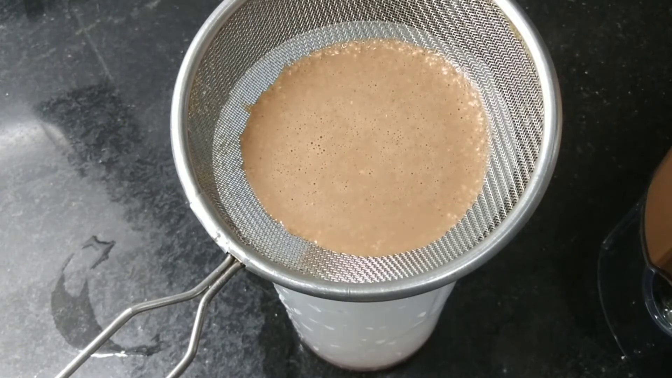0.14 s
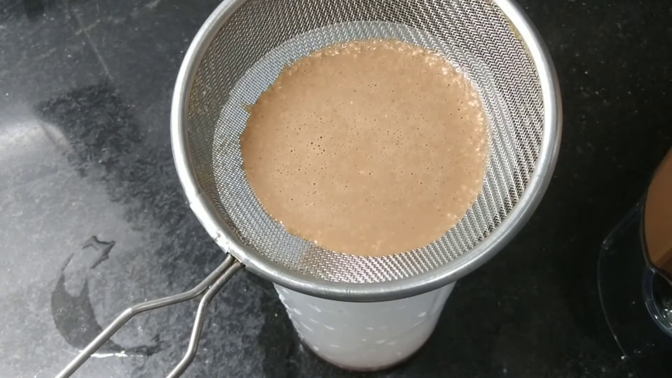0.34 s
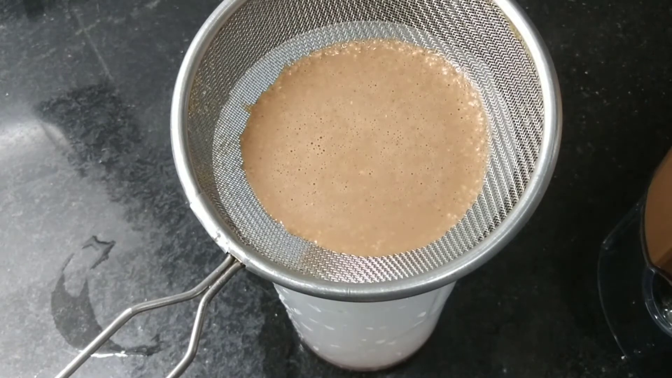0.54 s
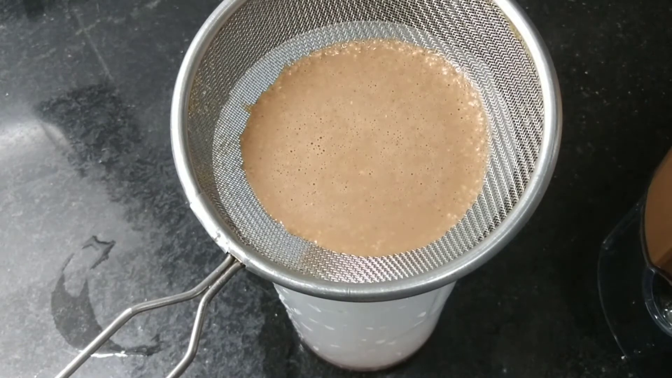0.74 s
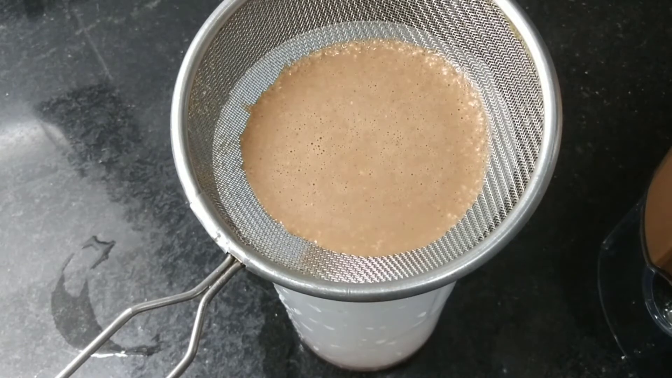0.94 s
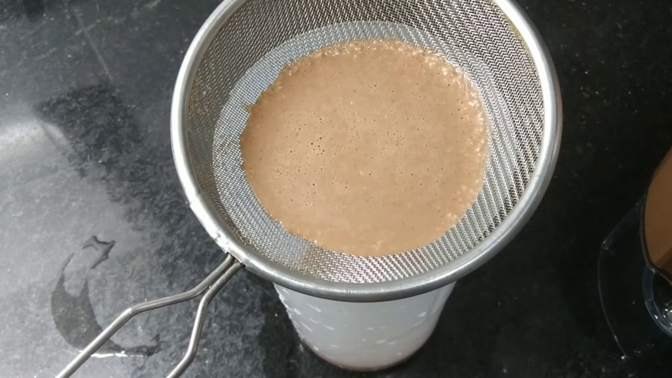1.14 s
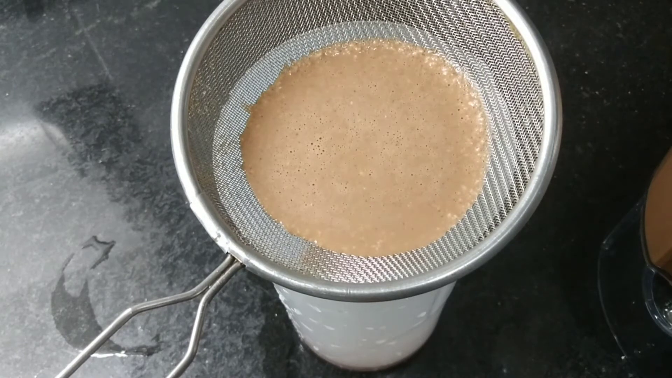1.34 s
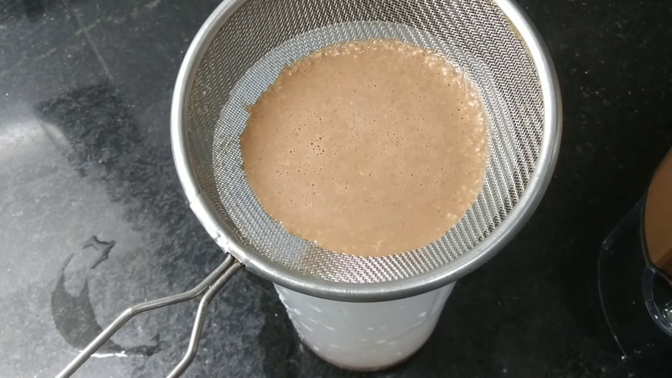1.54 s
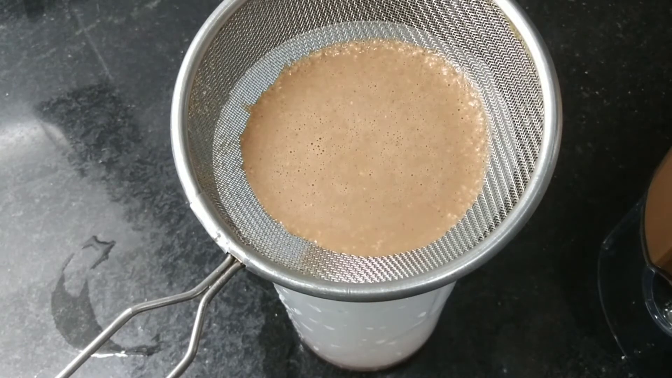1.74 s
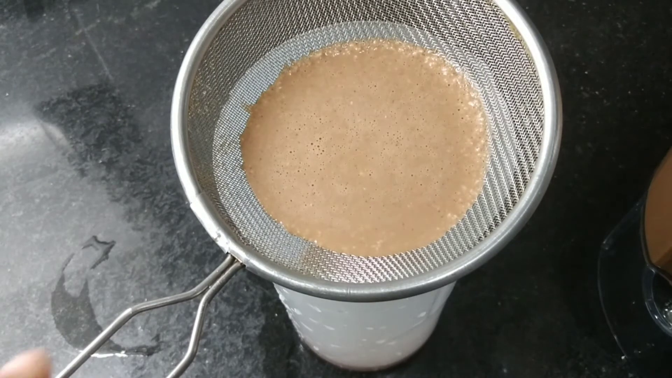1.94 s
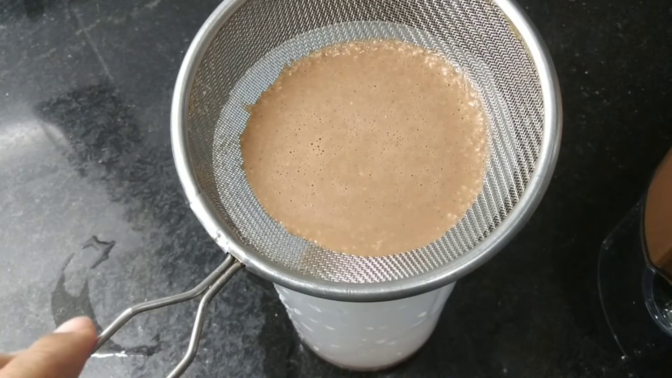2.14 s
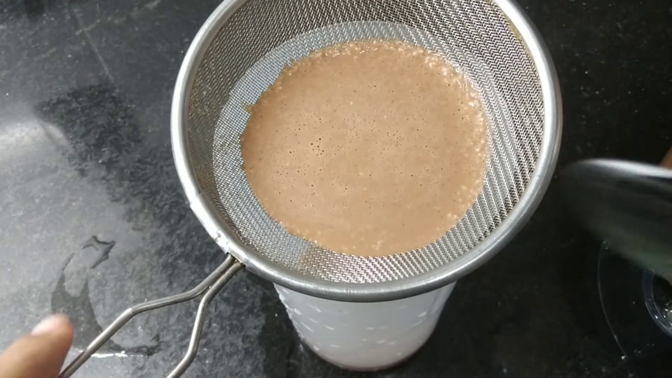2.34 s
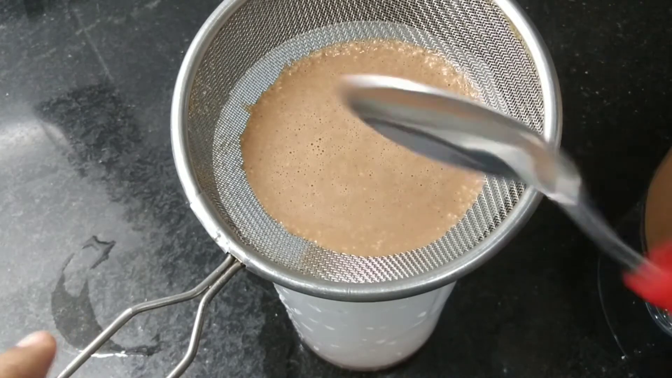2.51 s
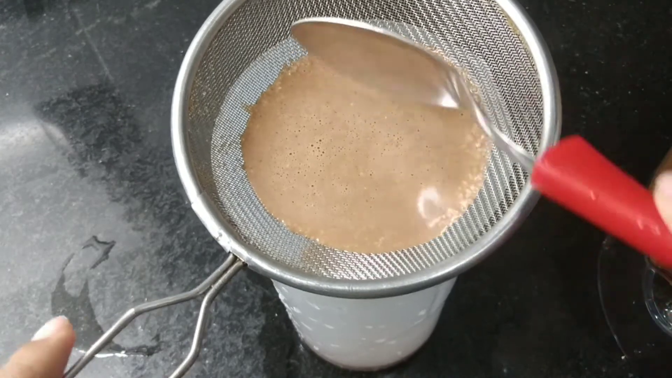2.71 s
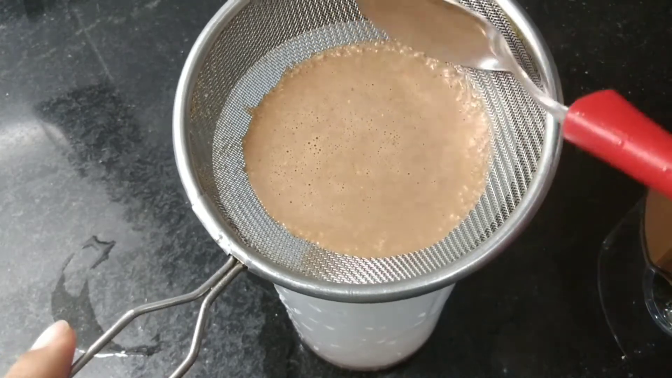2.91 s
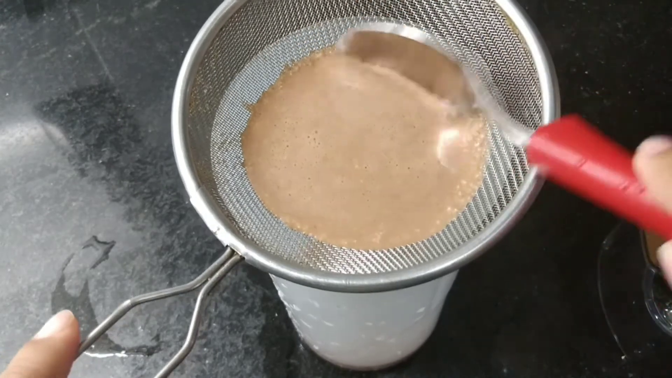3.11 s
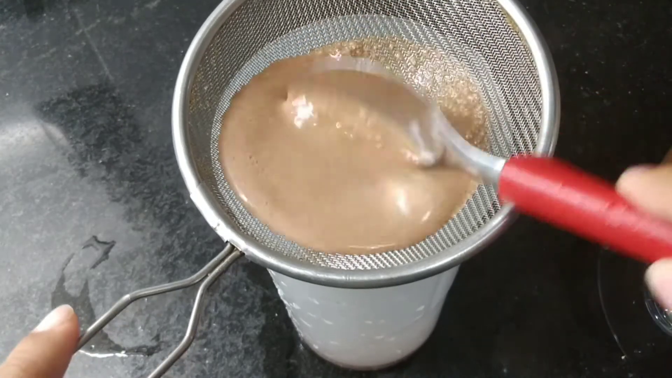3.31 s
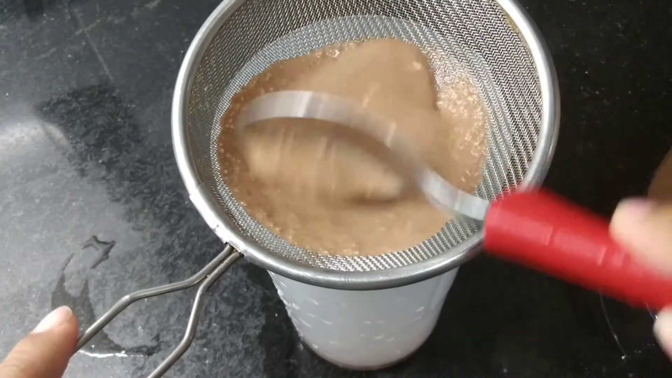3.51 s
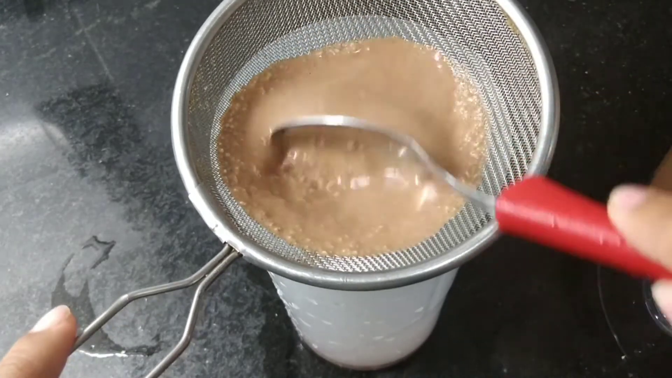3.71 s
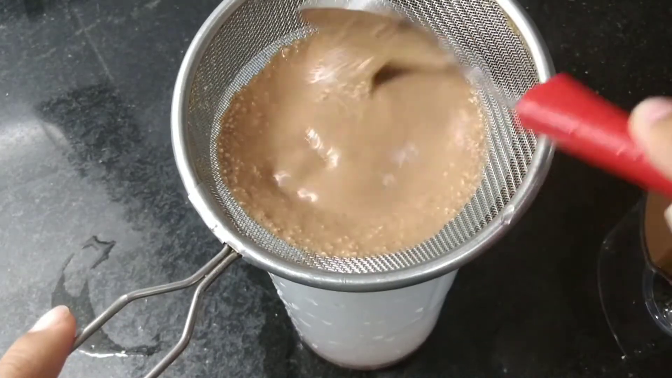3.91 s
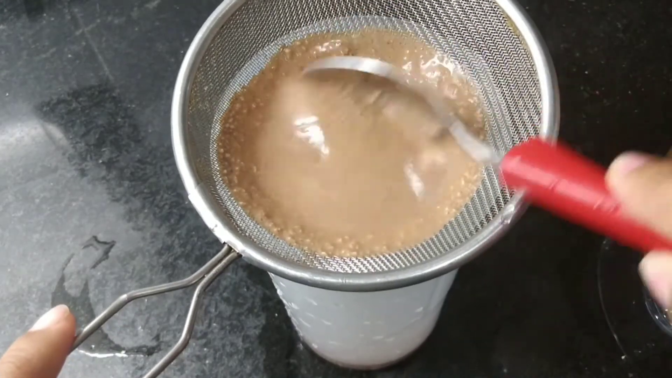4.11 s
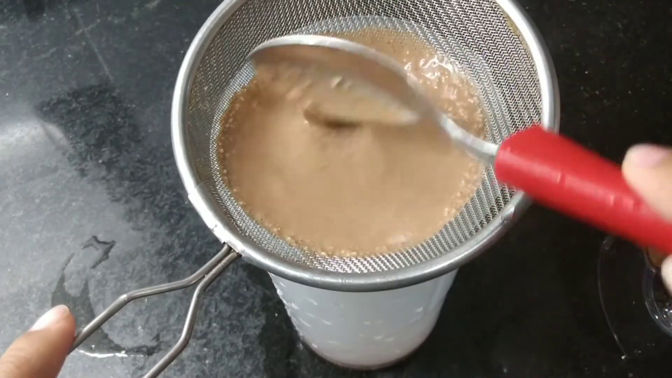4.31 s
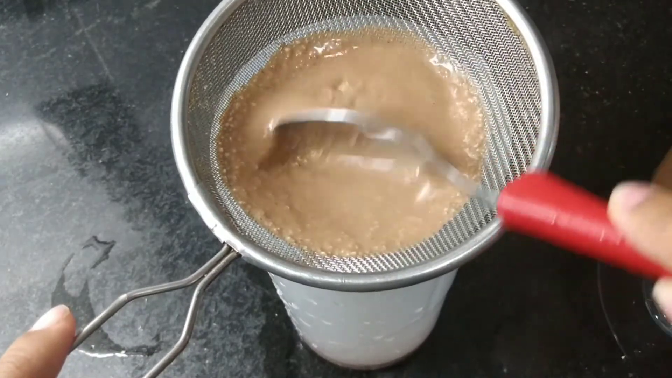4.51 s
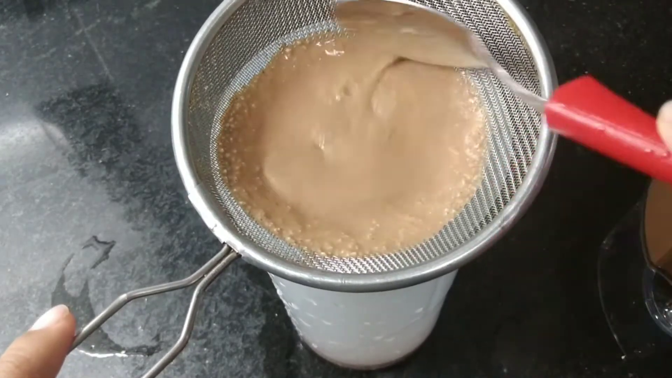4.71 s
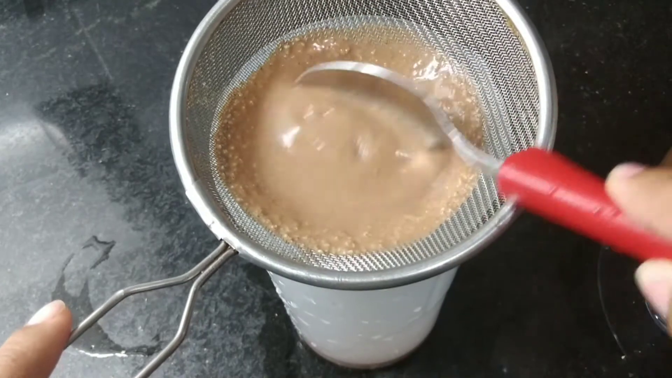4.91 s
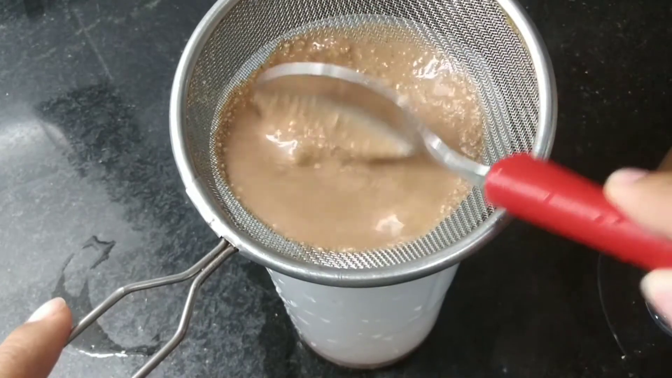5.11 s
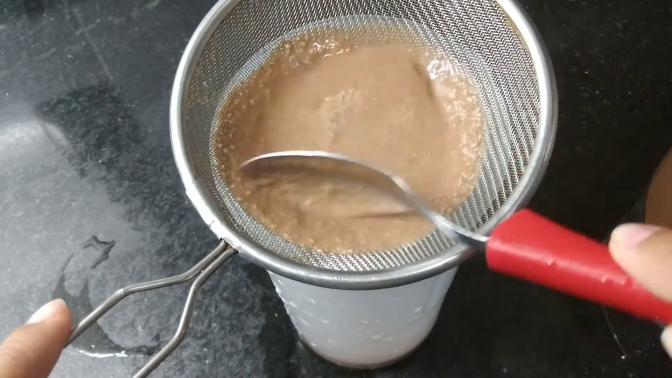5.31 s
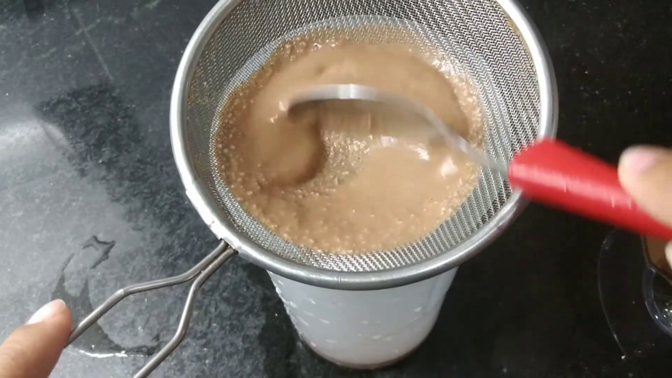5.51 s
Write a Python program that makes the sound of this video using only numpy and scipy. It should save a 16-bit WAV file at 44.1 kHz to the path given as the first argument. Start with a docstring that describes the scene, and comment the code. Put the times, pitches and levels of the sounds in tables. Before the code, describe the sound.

A cutlery drawer rumbles and bumps, spoons clink softly, then a metal spoon sweeps and knocks rhythmically over a wire sieve on a cup.

```python
"""A spoon sweeps over the wire mesh of a sieve that rocks on a tall cup: lumpy friction noise with
singing wires, a ringing frame, a cup resonance, modal knocks, liquid as a sinking resonance.
Before it a drawer of cutlery is pulled and bumps (shaped rumble, modal blows), fingers rustle and
spoons clink. Hollow drags sound further off, over a low hum of house and street (noise and two fuzzy
tones). A room rings; two spaced microphones listen through a noise suppressor."""
import sys
import numpy as np
from scipy import signal
from scipy.fft import rfft, irfft
from scipy.io import wavfile
from scipy.ndimage import uniform_filter1d

SR = 44100
rng = np.random.default_rng(int(sys.argv[2]) if len(sys.argv) > 2 else 0)


def int16_out(signal):
    """Quantize to a 16-bit WAV file."""
    q = np.round(np.clip(np.atleast_2d(signal).T, -1, 1) * 32767)
    wavfile.write(sys.argv[1], SR, q.astype(np.int16))


N = 244755


def gain_of(db):
    """Amplitude factor of a level in dB."""
    return 10 ** (np.asarray(db) / 20)


def evened(x):
    """Scales to rms 1."""
    return x / np.sqrt(np.mean(x ** 2) + 1e-20)


def read(points, hz):
    """Interpolates a (hz, value) table over log frequency."""
    f, value = np.transpose(points)
    return np.interp(np.log(hz + 1), np.log(f + 1), value)


def add(mix, start_s, sound):
    """Adds a sound at its start, cut at the end of the mix."""
    start = round(start_s * SR)
    part = mix[:, start:start + sound.shape[1]]
    part += sound[:, :part.shape[1]]


def shaped(x, points):
    """Filters both channels by a spectrum in dB, rms 1."""
    hz = np.fft.rfftfreq(x.shape[1], 1 / SR)
    return evened(irfft(rfft(x) * gain_of(read(points, hz)), x.shape[1]))


def resonate(x, hz, width_hz):
    """One resonance, rms 1."""
    return evened(signal.lfilter(*signal.iirpeak(hz, hz / width_hz, SR), x))


def grit(count, lumpy_db, lump_s=0.0015, patchy_db=3.5):
    """Friction noise: tiny catches come in lumps, and the colour drifts as other surface is touched."""
    lumps = evened(uniform_filter1d(rng.standard_normal(count), size=max(round(lump_s * SR), 1)))
    noise = rng.standard_normal((2, count)) * gain_of(lumpy_db * lumps)
    z = signal.stft(noise, nperseg=256)[2]
    patches = uniform_filter1d(rng.standard_normal(z.shape[1:]), size=5, axis=0)
    patches = uniform_filter1d(patches, size=8, axis=1)
    return signal.istft(z * gain_of(patchy_db * evened(patches)), nperseg=256)[1][:, :count]


def stroke(rise_s, hold_s, rise_db, fall_db_per_s, count):
    """Gain of one movement: a swell from first contact, a hold, a steady fade."""
    t = np.arange(count) / SR
    swell_db = -rise_db * np.maximum(1 - t / max(rise_s, 1e-3), 0)
    fade_db = -fall_db_per_s * np.maximum(t - rise_s - hold_s, 0)
    return gain_of(swell_db + fade_db) * signal.windows.tukey(count, 0.0014 * SR / count)


def blow_ring(modes, treble_db, ring_db, pitch, vary_db, spread, t):
    """Struck modes: each is a cluster of 4 close decaying partials, drawn anew for each blow."""
    hz, db, t60_s = np.repeat(np.transpose(modes), 4, axis=1)[:, :, None]
    draw = rng.standard_normal((4, len(hz), 1))
    lift_db = np.where(hz > 5400, treble_db, np.where(hz > 3400, ring_db, 0))
    size = gain_of(db + lift_db + vary_db * np.tanh(draw[0]) - 60 * t / t60_s)
    shift = np.where((hz > 2300) & (hz < 3400), 1, pitch)  # this band keeps its pitch
    detune = np.where(hz > 700, shift + spread * draw[1], 1 + 0.0065 * draw[1])
    phase = 2 * np.pi * hz * detune * t + 0.86 * draw[3]
    # phase between channels, one draw per mode
    apart = -np.repeat(1.4 + .4 * draw[2, ::4], 4, axis=0) * np.minimum(hz / 900, 1)
    return np.array([(size * np.sin(phase + k * apart)).sum(0) for k in (0, 1)])


def blow_crack(treble_db, ring_db, crack_db, crack_s, t):
    """Contact noise: a crack with t60 crack_s plus an 8 ms tick."""
    colour = [(150, -43.5), (700, -36.0), (1500, -10.5), (4200, ring_db - 7.5),
              (6000, treble_db), (9500, treble_db), (16000, treble_db - 44.0)]
    level_db = crack_db + max(treble_db, ring_db - 10.0, 0)
    crack = shaped(rng.standard_normal((2, len(t))), colour) * gain_of(level_db)
    return crack * (gain_of(-60 * t / crack_s) + gain_of(-15.0 - 60 * t / 0.008))


def blows(events, modes, crack_db, crack_s, vary_db, spread):
    """Impacts: ringing modes started by a crack, with a 1.5 ms attack."""
    out, t = np.zeros((2, N)), np.arange(SR // 6) / SR
    for start_s, blow_db, treble_db, *more in events:
        ring_db, pitch = more or (0, 1)
        ring = blow_ring(modes, treble_db, ring_db, pitch, vary_db, spread, t)
        crack = blow_crack(treble_db, ring_db, crack_db, crack_s, t)
        add(out, start_s, gain_of(blow_db - 16.0) * (ring + crack) * np.minimum(t / 0.0015, 1))
    return out


# hum noise spectrum, relative: hz, level_db_per_hz
HUM_SPECTRUM = [(20, -19), (55, -10), (80, 4), (228, -4.5), (420, -5), (650, -15.5), (1200, -38.5),
                (8000, -29), (11000, -44), (14000, -85)]
# fuzzy tones: pitch_hz, width_hz, over_noise_db
HUM_TONES = [(85.15, 1.6, -11), (300.8, 4.6, -7.5)]
# hum level: time_s, level_db
HUM_COURSE = [(0, -62.5), (1.5, -65.5), (1.6, -61), (1.7, -65), (2.9, -61.5), (4.301, -66.5),
              (4.498, -64.5), (4.7, -62), (5.2, -62), (5.35, -56.5), (5.55, -64)]


def hum():
    """House and street: low noise with two fuzzy tones."""
    x = rng.standard_normal((2, N))
    tones = sum(gain_of(db) * resonate(x, hz, width_hz) for hz, width_hz, db in HUM_TONES)
    level_db = np.interp(np.arange(N) / SR, *np.transpose(HUM_COURSE))
    return gain_of(level_db) * (shaped(x, HUM_SPECTRUM) + tones)


# hollow dragging: start_s, rise_s, hold_s, level_db
DRAG_MOVES = [(1.956, 0.044, 0.29, -76), (2.46, 0.029, 0.32, -61), (3.238, 0.11, 0.086, -50)]
# resonances, one list per drag: pitch_hz, width_hz, level_db (relative)
DRAG_RESONANCES = [
    [(574, 80, -1), (792, 37, 7)],
    [(2370, 560, -10), (561, 50, 4.5), (919, 20, -2.5), (1061, 15, -4), (1760, 23, -10), (1210, 480, -6.5),
     (4630, 230, -8.5)],
    [(686, 21, 0.99), (765, 17.5, 6.8), (1300, 28, 4.2)],
]
DRAG_RISE_DB, DRAG_FALL_DB_PER_S = 23, 66


def drags():
    """Dragging further off: friction noise in the resonances of a hollow thing."""
    out = np.zeros((2, N))
    for (start_s, rise_s, hold_s, level_db), peaks in zip(DRAG_MOVES, DRAG_RESONANCES):
        x = grit(SR, 1.5, 0.03, 2.)
        body = evened(sum(gain_of(db) * resonate(x, hz, width_hz) for hz, width_hz, db in peaks))
        pull = stroke(rise_s, hold_s, DRAG_RISE_DB, DRAG_FALL_DB_PER_S, count=SR)
        add(out, start_s, gain_of(level_db) * pull * body)
    return out


# drawer pushes: start_s, rise_s, hold_s, rumble_db, treble_over_rumble_db
DRAWER_PUSHES = [(0.084, 0.0021, 0.023, -63, 4), (0.129, 0.026, 0.092, -44.5, -4.5),
                 (0.369, 0.0027, 0.014, -37, -3), (0.584, 0.02, 0.0059, -52, 0.5)]
# rumble spectrum, relative: hz, level_db_per_hz
DRAWER_SPECTRUM = [(56, -59.5), (95, 1.5), (170, -14), (300, -6.5), (520, -5.5), (884, -3.5), (1190, -9.5),
                   (8410, -17.5), (16000, -32.5)]
# wood and its load of steel: pitch_hz, level_db, t60_s
DRAWER_RING = [(113.7, -16.5, 0.72), (569, -15, 0.21), (625, -7, 0.15), (975, -29.5, 0.22),
               (1212, -6.5, 0.15), (1642, -6, 0.1), (2166, 4.5, 0.021), (4590, 0.5, 0.018),
               (6500, 1, 0.051), (7820, 0.5, 0.094), (8400, 5.5, 0.091)]
# bumps: start_s, blow_db, treble_over_blow_db, clatter_4khz_over_blow_db, pitch_factor
DRAWER_HITS = [(0.093, -61.5, 9.5, -1.5, 1.4), (0.13, -46.5, 5.5, -4.5, 1.16),
               (0.158, -35.5, -7.5, -1, 1.03), (0.242, -49, 7.5, -3.5, 1.06), (0.284, -36.5, -17, -9, 0.99),
               (0.376, -24, -6.5, 4, 1), (0.425, -26.5, -14.5, -3, 0.93), (0.524, -51, 10.5, 15, 1.1),
               (0.611, -45.5, 1, 7, 1.26), (0.629, -49, 3.5, 13, 1)]
DRAWER_RISE_DB, DRAWER_FALL_DB_PER_S = 8, 147


def drawer():
    """Runners rumble as friction noise, split at 4.8 kHz, while the load rattles in modal blows."""
    out = blows(DRAWER_HITS, DRAWER_RING, crack_db=12.6, crack_s=0.058, vary_db=3.8, spread=0.02)
    treble_pass = signal.butter(4, 4800, "high", fs=SR, output="sos")
    for start_s, rise_s, hold_s, rumble_db, treble_db in DRAWER_PUSHES:
        x = shaped(grit(SR // 2, 1.0, 0.00077), DRAWER_SPECTRUM)
        high = signal.sosfilt(treble_pass, x)
        rumble = evened(x - high) + gain_of(treble_db) * evened(high)
        push = stroke(rise_s, hold_s, DRAWER_RISE_DB, DRAWER_FALL_DB_PER_S, count=SR // 2)
        add(out, start_s, gain_of(rumble_db) * push * rumble)
    return signal.sosfilt(signal.butter(4, 85, "high", fs=SR, output="sos"), out)


# finger brushes: middle_s, level_db, half_length_s, middle_tones_over_hiss_db
RUSTLE_MOVES = [(1.183, -60, 0.038, -8), (1.336, -58, 0.064, -16), (1.572, -62.5, 0.045, -4.5),
                (1.619, -67.5, 0.038, 6), (1.705, -78, 0.015, 16), (1.81, -68.5, 0.027, -0.5),
                (1.908, -72.5, 0.027, 12), (1.976, -54, 0.022, -16), (2.027, -61, 0.042, -6.5),
                (2.102, -72, 0.03, -1), (2.242, -58, 0.047, -17), (2.329, -66, 0.031, 4.5)]
# hiss spectrum, relative: hz, level_db_per_hz
RUSTLE_HISS_SPECTRUM = [(2650, -47), (4500, -75), (5220, -12.5), (8460, 0), (12300, -14), (15100, -23),
                        (16000, -16)]
# middle tones spectrum, relative: hz, level_db_per_hz
RUSTLE_MIDDLE_SPECTRUM = [(1300, -68), (2000, 3), (2800, 10), (3300, 2.5), (5000, 6.5), (6500, -28)]


def rustles():
    """Fingers brush along the cutlery: friction noise in soft Gaussian swells."""
    out = np.zeros((2, N))
    for middle_s, level_db, half_s, middle_db in RUSTLE_MOVES:
        t = np.arange(-3 * half_s, 3 * half_s, 1 / SR)
        x = grit(len(t), 1.5, .004, 2.5)
        hiss = shaped(x, RUSTLE_HISS_SPECTRUM) + gain_of(middle_db) * shaped(x, RUSTLE_MIDDLE_SPECTRUM)
        add(out, middle_s + t[0], gain_of(level_db) * np.exp(-(t / half_s) ** 2) * hiss)
    return out


# cutlery: pitch_hz, level_db, t60_s
CUTLERY_RING = [(431.3, -5.5, 0.13), (1425, -17.5, 0.094), (1500, -7, 0.13), (2603, 3, 0.049),
                (2760, -1, 0.11), (3690, -2.5, 0.066), (7430, -0.5, 0.031)]


def chatter(level_db, until_s, ticks_per_s):
    """Loose cutlery ticks faintly in its tray: random impulses, about half of them into each mode."""
    count = round(until_s * SR)
    sizes = gain_of(1.4 * np.minimum(rng.exponential(1, count), 3))
    ticks = (rng.random(count) < ticks_per_s / SR) * sizes * rng.standard_normal((2, count))
    ring = np.zeros((2, count))
    for hz, db, t60_s in CUTLERY_RING[:-1]:
        ring += gain_of(db) * resonate(ticks * (rng.random(count) < .5), hz, 7 / t60_s)
    out = np.zeros((2, N))
    add(out, 0, gain_of(level_db) * evened(ring))
    return out


# spoon clinks: start_s, blow_db, treble_over_blow_db
CLINK_HITS = [(0.792, -63, 9), (0.9428, -49, -3), (1.064, -57.5, -22), (1.108, -53, -14),
              (1.1411, -47, -12), (1.1747, -48.5, -55), (1.216, -67.5, 24.5), (1.421, -51, -6),
              (1.5734, -70, -9), (1.6175, -59.5, 21.5), (1.6939, -60, 21.5), (1.746, -46, -5),
              (1.7934, -50, 8), (1.907, -52.5, -11), (1.9585, -52.5, 10), (2.0988, -52, 18),
              (2.169, -51, 11.5), (2.3027, -51.5, 10), (2.34, -48, -9), (2.4722, -59, -38),
              (2.536, -49, -28), (2.6354, -49.5, -15), (2.7353, -49, 6.5), (2.788, -49, -7),
              (2.8825, -51.5, 21), (2.9212, -52.5, 13.5), (2.9716, -46.5, 13), (3.4934, -48, 16),
              (3.5047, -40, 15.5)]


def clinking():
    """Spoons clink as modal blows over the faint chatter of the tray."""
    clinks = blows(CLINK_HITS, CUTLERY_RING, crack_db=5.3, crack_s=0.05, vary_db=4.0, spread=.025)
    return clinks + chatter(level_db=-74, until_s=3.07, ticks_per_s=250)


# liquid strokes: start_s, rise_s, hold_s, level_db, pitch_hz
SLOSH_MOVES = [(4.039, 0.015, 0.02, -58.5, 1406), (4.459, 0.089, 0.11, -69, 820),
               (4.775, 0.031, 0.013, -55, 1350), (4.917, 0.093, 0.037, -61, 1330),
               (5.245, 0.16, 0.042, -61.5, 2100)]
SLOSH_RISE_DB, SLOSH_FALL_DB_PER_S = 7, 112
SLOSH_SAG_PER_S, SLOSH_WIDTH_HZ = 0.72, 280


def slosh():
    """Thick liquid slides round the spoon: lumpy noise in a resonance that sinks as the liquid closes."""
    out, t = np.zeros((2, N)), np.arange(SR // 2) / SR
    r = np.exp(-np.pi * SLOSH_WIDTH_HZ / SR)
    for start_s, rise_s, hold_s, level_db, pitch_hz in SLOSH_MOVES:
        sinking_hz = pitch_hz * (1 - SLOSH_SAG_PER_S * t)
        turn = np.exp(2j * np.pi * np.cumsum(sinking_hz) / SR)
        # shift down to 0 Hz, low-pass, shift back
        low = signal.lfilter([1], [1, -2 * r, r * r], grit(len(t), 1.5, 0.008, 2.5) / turn)
        x = evened((turn * low).real)
        move = stroke(rise_s, hold_s, SLOSH_RISE_DB, SLOSH_FALL_DB_PER_S, count=len(t))
        add(out, start_s, gain_of(level_db) * move * x)
    return out


# sieve: pitch_hz, level_db, t60_s
SIEVE_RING = [(370.2, -5, 0.14), (1398, -14, 0.16), (1560, -5, 0.029), (2036, 5, 0.045), (2462, 0.5, 0.052),
              (2775, -4.5, 0.029), (4260, -5, 0.014), (8030, -3.5, 0.028)]
FRAME_DB, CATCHES_PER_S = -15, 350


def frame(x):
    """Single wires snag at random and ring the sieve's frame, rms 1."""
    count = x.shape[1]
    caught = rng.random(count) < CATCHES_PER_S / SR
    snags = x * caught * gain_of(4.0 * np.minimum(rng.exponential(1, count), 3))
    ring = np.zeros_like(x)
    for hz, db, t60_s in SIEVE_RING[1:]:
        ring += gain_of(.5 * db) * resonate(snags, hz * rng.uniform(.95, 1.02), 4 / t60_s)
    return evened(ring)


# walls of cup and counter, relative: hz, level_db_per_hz
CUP_WALLS = [(120, -19), (220, 8.5), (600, -3.5), (1100, -18), (2000, -40)]
CUP_HZ, CUP_WIDTH_HZ, CUP_SECOND_WIDTH_HZ = 362, 26, 64.6


def cup(x):
    """Noise through two resonances is the cup's air column; the friction also stirs its walls."""
    air = resonate(rng.standard_normal(x.shape[1]), CUP_HZ, CUP_WIDTH_HZ)
    return resonate(air, CUP_HZ, CUP_SECOND_WIDTH_HZ) + gain_of(-7.0) * shaped(x, CUP_WALLS)


RUB_RISE_DB, RUB_FALL_DB_PER_S = 8, 234
SING_DB, SING_WIDTH = -5, 0.1  # over the hiss; width as share of pitch
CUP_RISE_DB, CUP_LINGER_S, CUP_FALL_DB_PER_S = 11, 0.043, 222  # the cup hums on after the stroke


def rubbing(strokes, hiss, lumpy_db, patchy_db):
    """Catches on fine metal hiss and sing; strokes with a cup level also ring frame and cup."""
    out, count = np.zeros((2, N)), SR // 2
    for start_s, rise_s, hold_s, hiss_db, top_db, sing_hz, *cup_db in strokes:
        x = grit(count, lumpy_db, 0.00099, patchy_db)
        singing = gain_of(SING_DB) * resonate(x, sing_hz, SING_WIDTH * sing_hz)
        wires = shaped(shaped(x, hiss) + singing, [(8500, 0.003), (12500, top_db)])
        move = stroke(rise_s, hold_s, RUB_RISE_DB, RUB_FALL_DB_PER_S, count)
        sound = gain_of(hiss_db) * wires * move
        for level_db in cup_db:
            sound += gain_of(hiss_db + FRAME_DB) * frame(x) * move
            breath = stroke(rise_s, hold_s + CUP_LINGER_S, CUP_RISE_DB, CUP_FALL_DB_PER_S, count)
            sound += gain_of(level_db) * cup(x) * breath
        add(out, start_s, sound)
    return out


# strokes on the rim: start_s, rise_s, hold_s, hiss_db, top_octave_over_hiss_db, sing_hz
RIM_STROKES = [(2.884, 0.0017, 0.0041, -54.5, 4, 7550), (2.973, 0.044, 0.018, -51.5, 7.5, 7900)]
# rim hiss spectrum, relative: hz, level_db_per_hz
RIM_HISS = [(940, -56), (1600, 1), (5990, 5.5), (7260, -2), (13500, -2.5), (16000, -10)]


def rim_strokes():
    """The spoon feels its way along the rim: friction hiss without the cup."""
    return rubbing(RIM_STROKES, RIM_HISS, lumpy_db=1.8, patchy_db=2.3)


# sieve knocks: start_s, blow_db, treble_over_blow_db, spoon_ring_4khz_over_blow_db,
# pitch_factor (load on the mesh shifts; the rim near 2.5 kHz keeps its pitch)
SIEVE_HITS = [(3.097, -53, 5, -3, 1), (3.8646, -31, -28, -15.5, 0.98), (4.009, -53, 13.5, -10, 0.71),
              (4.3937, -47, 4, -4, 1.0), (4.4383, -39.5, 13, 17.5, 0.98), (4.557, -38.5, -3, 15.5, 1),
              (4.6042, -36, 3, 11.5, 0.94), (4.6683, -37.5, -19, -3, 0.91), (4.7616, -52, 19.5, 0, 0.83),
              (4.791, -47, 1, -3, 0.97), (4.8791, -40, 9.5, 22, 0.95), (4.931, -46.5, 3, -13, 0.95),
              (5.0561, -46, 0, 20.5, 0.91), (5.1686, -46.5, -10, 15.5, 0.95), (5.2208, -42, -29, -10, 0.91),
              (5.258, -49.5, -7, 15.5, 0.893), (5.3253, -54.5, 24, 22, 0.91), (5.337, -40.5, -5, -4, 0.97),
              (5.389, -42.5, 15, -1, .94), (5.3804, -49.5, 25.5, 22, 0.97), (5.4144, -52, 26, 27.5, 0.93),
              (5.4446, -46, 1, 22.5, 0.94), (5.5223, -47.5, -1, -9.5, 0.99)]


def sieve_knocks():
    """The sieve rocks on the cup and the spoon strikes it: modal blows."""
    return blows(SIEVE_HITS, SIEVE_RING, crack_db=3.24, crack_s=0.046, vary_db=1.2, spread=.016)


# mesh strokes: start_s, rise_s, hold_s, hiss_db, top_octave_over_hiss_db, sing_hz, cup_hum_db
MESH_STROKES = [(3.085, 0.028, 0.023, -40.5, -1, 8750, -49), (3.17, 0.093, 0.036, -45.5, -6.5, 8660, -61.5),
                (3.322, 0.0039, 0.098, -45.5, -13, 6300, -67), (3.5, 0.0039, 0.0042, -44.5, -11, 7100, -61),
                (3.61, 0.022, 0.057, -53.5, 0, 8400, -59), (4.008, 0.067, 0.024, -41, 1, 8730, -51),
                (4.436, 0.011, 0.053, -50.5, -2, 8300, -54.5),
                (4.762, 0.0025, 0.076, -46.5, 1, 8660, -54.5),
                (4.906, 0.033, 0.057, -49, -6.5, 9000, -57.5),
                (5.324, 0.0013, 0.053, -48.5, 2.5, 8600, -57.5)]
# mesh hiss spectrum, relative: hz, level_db_per_hz
MESH_SPECTRUM = [(260, -71), (450, -1.5), (922, -10), (1340, -10.5), (1650, -9), (2470, -2.5), (6060, -4),
                 (9200, -1.5), (13000, -6.5), (16000, -17.5)]


def mesh_sweeps():
    """The spoon sweeps over the mesh: friction hiss, singing wires, frame and cup."""
    return rubbing(MESH_STROKES, MESH_SPECTRUM, lumpy_db=0.84, patchy_db=3.)


# room decay: hz, t60_s
ROOM_DECAY = [(200, 0.2), (1000, 0.33), (4000, 0.31), (12000, 0.25)]


def room(x):
    """Sparse taps of random sign, each band dying at its own speed."""
    count = SR // 2
    taps = np.zeros((2, count))
    at = np.arange(200, count - 20, 20) + rng.integers(0, 20, (2, (count - 201) // 20))
    np.put_along_axis(taps, at, rng.choice([-1., 1.], at.shape), 1)
    hz, t, z = signal.stft(taps, SR, nperseg=256)
    decay = gain_of(-60 * t / read(ROOM_DECAY, hz)[:, None])
    tail = signal.istft(z * decay, SR, nperseg=256)[1]
    return signal.fftconvolve(x, tail / np.linalg.norm(tail[0]), axes=1)[:, :N]


def scene():
    """Sums the near sources, their room sound, the drags and the hum."""
    clinks, knocks, near_drawer = clinking(), sieve_knocks(), drawer()
    rubs = rustles() + rim_strokes() + mesh_sweeps() + slosh()
    send = gain_of(-6.5) * clinks + gain_of(-6.0) * knocks
    send += gain_of(-10.5) * rubs + gain_of(-1.5) * near_drawer
    return clinks + knocks + rubs + near_drawer + room(send) + drags() + hum()


GATE_OVER_DB, GATE_DEPTH_DB = 2.5, 4.5  # threshold over the quiet level; depth


def suppress(x):
    """Noise suppressor: lowers each band while it stays near its own quiet level (15th percentile)."""
    z = signal.stft(x, nperseg=1024, noverlap=768)[2]
    power = uniform_filter1d((abs(z) ** 2).mean(0), size=3, axis=1)
    db = 10 * np.log10(power + 1e-20)
    quiet_db = uniform_filter1d(np.percentile(db, 15, axis=1), size=9)[:, None]
    shut = .5 - .5 * np.tanh(db - quiet_db - GATE_OVER_DB)
    return signal.istft(z * gain_of(-GATE_DEPTH_DB * shut), nperseg=1024, noverlap=768)[1][:, :N]


# spaced microphones: hz, left_right_likeness (0 to 1)
LIKENESS = [(25, 0.73), (60, 0.94), (300, 0.74), (640, 0.17), (1400, 0.0086), (15000, 0.011)]
EDGE_HZ = 15900


def record(dry):
    """Long waves reach both microphones alike; then a noise suppressor and the band limit."""
    same = np.clip(read(LIKENESS, np.fft.rfftfreq(N, 1 / SR)), 0, .99)
    mid = rfft(dry[0] + dry[1]) * np.sqrt(1 + same) / 2
    side = rfft(dry[0] - dry[1]) * np.sqrt(1 - same) / 2
    pair = irfft(np.array([mid + side, mid - side]), N) * gain_of([[.5], [-.5]])  # left 1 dB louder
    low_pass = signal.firwin(511, EDGE_HZ, window=("kaiser", 9), fs=SR)
    return signal.oaconvolve(suppress(pair), low_pass[None], "same")


dry = scene()
out = record(dry)
int16_out(out)
```